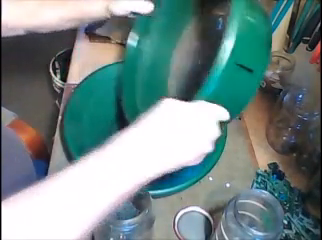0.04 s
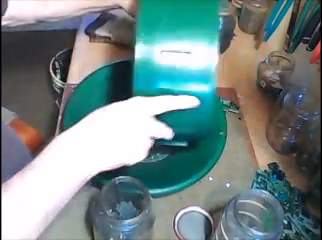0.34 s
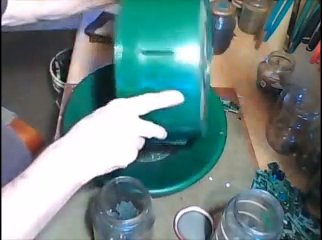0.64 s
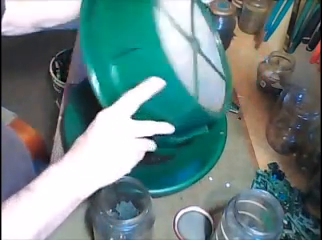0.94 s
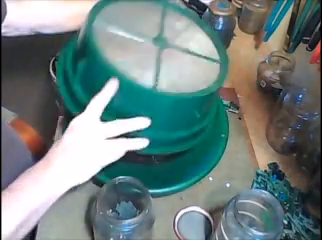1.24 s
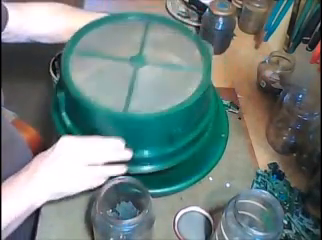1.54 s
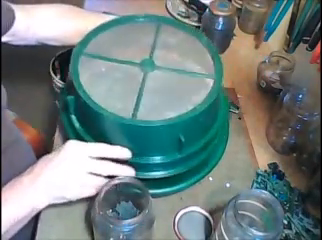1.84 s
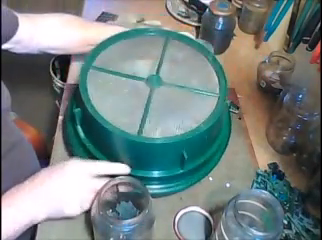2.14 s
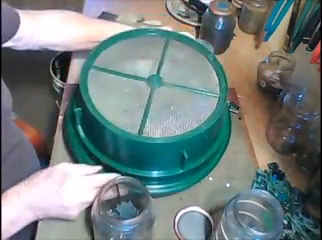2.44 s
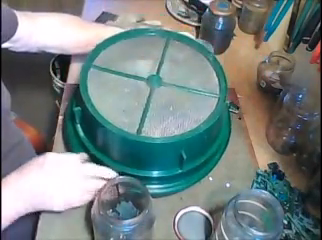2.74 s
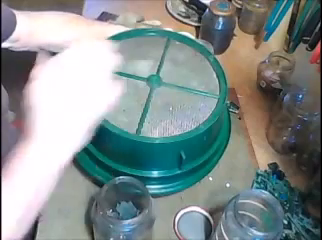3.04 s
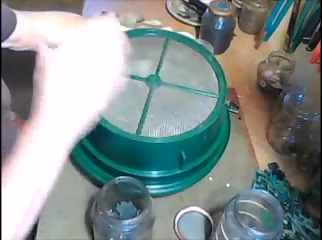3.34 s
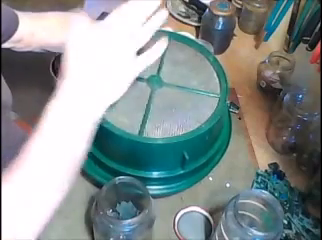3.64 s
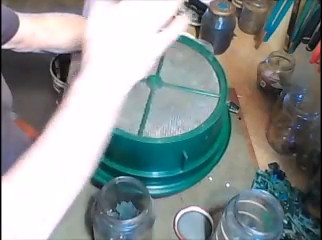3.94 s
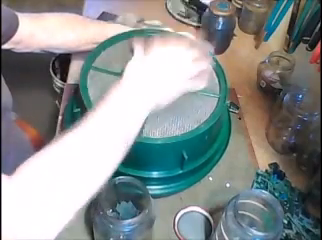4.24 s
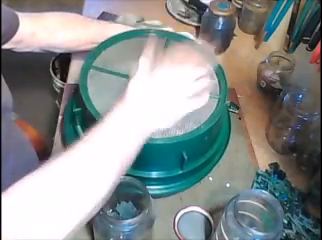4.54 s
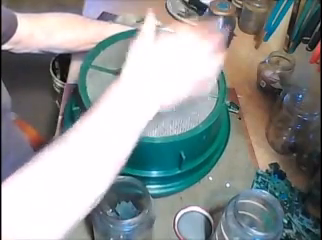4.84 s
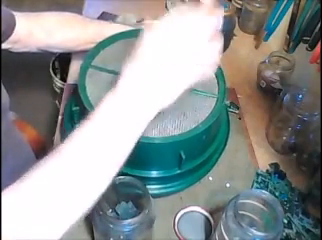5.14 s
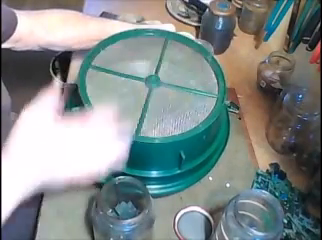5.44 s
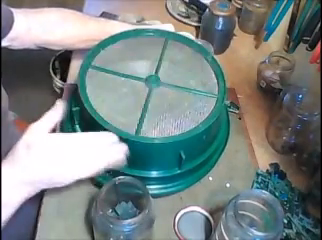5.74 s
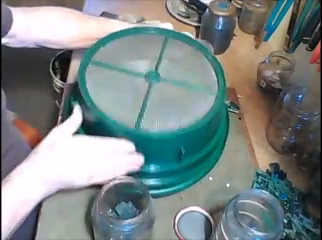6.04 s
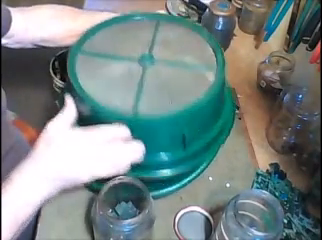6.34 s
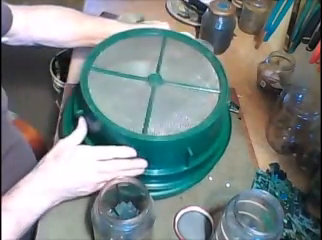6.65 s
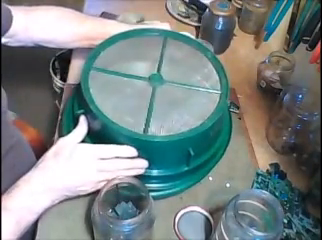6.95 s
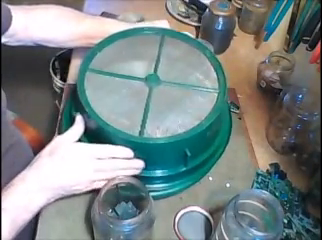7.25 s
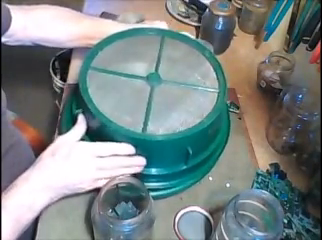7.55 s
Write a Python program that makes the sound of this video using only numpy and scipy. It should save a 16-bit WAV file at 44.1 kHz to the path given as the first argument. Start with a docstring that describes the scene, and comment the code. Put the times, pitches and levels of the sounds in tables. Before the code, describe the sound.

In a small, slightly reverberant room with a steady low hum, a plastic sieve is handled with soft bumps and ticks, then clunks onto a plastic pan. Two short rubs across the mesh lead into a run of six sharp hand slaps that shake powder loose with a faint hiss. Another loud hollow knock follows as the sieve drops again, and a lighter one ends it.

```python
"""Over room rumble and mains hum, a plastic sieve is turned over above a plastic pan on a workshop bench:
powder hisses, grit and fingers tick, and handling bumps and rubs the plastic. The sieve drops in, a hand
drags over its screen, and six slaps on the rim free the powder. It is lifted, dropped again, and settles
with a last bump. Each impact excites damped modes of sieve and pan, and a small room reverberates."""
import sys
import numpy as np
from scipy import signal
from scipy.fft import rfft, irfft, next_fast_len
from scipy.io import wavfile

SR = 44100
rng = np.random.default_rng(int(sys.argv[2]) if len(sys.argv) > 2 else 0)


def generate_wav(sig):
    """Save sig (samples, or channels by samples) to the path in sys.argv[1] as 16-bit PCM at SR."""
    pcm = np.round(np.clip(np.atleast_2d(sig).T, -1, 1) * 32767).astype(np.int16)
    wavfile.write(sys.argv[1], SR, pcm)


N = 339755
TIME = np.arange(N) / SR
# centres of the five registers of a contact force (thud, body, knock, clack, crack): f/Hz
REGISTER_HZ = [140, 350, 660, 1400, 6000]


def from_db(db):
    """Amplitude ratio of a level in decibels."""
    return 10 ** (np.asarray(db) / 20)


def rms_one(x):
    """Normalisation to unit mean power."""
    return x / np.sqrt(np.mean(x ** 2) + 1e-20)


def at_hz(table, hz, column=1):
    """Interpolation of one column on a logarithmic frequency axis."""
    table = np.array(table)
    return np.interp(np.log(hz), np.log(table[:, 0]), table[:, column])


def clicks(times, heights):
    """Impulsive excitation: one impulse per contact."""
    out = np.zeros(N)
    np.add.at(out, np.round(times * SR).astype(int), heights)
    return out


def ring(hits, hz, t60):
    """Damped harmonic oscillator: a unit impulse starts a decaying sine of amplitude 1."""
    radius, angle = from_db(-60 / (t60 * SR)), 2 * np.pi * hz / SR
    return signal.lfilter([0, np.sin(angle)], [1, -2 * radius * np.cos(angle), radius ** 2], hits + 1e-18)


def fade(hits, t60):
    """Exponential decay: each impulse dies away by 60 dB in t60 seconds."""
    return signal.lfilter([1], [1, -from_db(-60 / (t60 * SR))], hits + 1e-18)


def swell(middle, spread):
    """Gaussian envelope of a smooth stroke."""
    return np.exp(-((TIME - middle) / spread) ** 2)


def noise_bands(lowest_hz):
    """Half-octave filter bank: yields centre f/Hz, filter, and white noise of unit power in that band."""
    edges_hz = 22 * 2 ** np.arange(0, 9.6, .5)
    for low, high in zip(edges_hz, edges_hz[1:]):
        if high > lowest_hz:
            sos = signal.butter(2, [low, high], "band", fs=SR, output="sos")
            yield np.sqrt(low * high), sos, rng.choice([-1, 1], N) * np.sqrt(SR / 2 / (high - low))


def coloured_noise(spectrum):
    """Spectral shaping of white noise, scaled to unit power."""
    size = next_fast_len(N)
    hz = np.maximum(np.arange(size // 2 + 1) * SR / size, 1)
    shaped = rfft(rng.standard_normal(size)) * from_db(at_hz(spectrum, hz))
    return rms_one(irfft(shaped, size)[:N])


def contact(t, force, db, tilt=0, thud_db=0, body_db=0, knock_db=0, crack_db=0):
    """One blow as (t/s, level/dB in each register); hardness tilts its spectrum, in dB per octave."""
    octaves = np.log2(np.array(REGISTER_HZ) / REGISTER_HZ[1])
    return [t, *(np.array(force) + db + tilt * octaves + [thud_db, body_db, knock_db, 0, crack_db])]


def force_db(blows, hz):
    """Force spectrum of each blow at one frequency; a sharp clack also shakes the bench in the bass."""
    registers = np.log([45] + REGISTER_HZ)
    return np.array([np.interp(np.log(hz), registers, [clack, thud, body, knock, clack, crack])
                     for t, thud, body, knock, clack, crack in blows])


def background(rumble_db=-47):
    """Stationary noise floor: broadband room rumble and two tones of mains hum."""
    # room rumble: f/Hz, relative spectral level/dB
    rumble = [(25, -1), (60, 2), (130, -9), (190, -4.5), (280, -12.5), (390, -9.5), (600, -17),
              (1000, -20.5), (1450, -23.5), (1800, -34.5), (2300, -44), (6000, -49.5), (10000, -55.5),
              (15500, -62)]
    # mains tones: f/Hz, rms level/dB
    mains = [(59.6, -70.5), (119.6, -52.5)]
    hum = sum(np.sqrt(2) * from_db(db) * np.sin(2 * np.pi * (hz * TIME + rng.random()))
              for hz, db in mains)
    return from_db(rumble_db) * coloured_noise(rumble) + hum


def powder(grains_per_s=45, grain_db=5.0, grain_t60=0.015):
    """Shot noise: fine powder merges into a hiss, from which coarser grains stand out at random."""
    # powder sliding over screen and pan: t/s, level/dB
    slide = [(0, -71.5), (1.3, -74), (2.0, -63), (2.6, -62.5), (2.9, -77), (5.2, -60), (5.6, -80),
             (6.85, -98), (7.05, -72), (7.7, -67.5)]
    # its hiss: f/Hz, relative spectral level/dB
    spectrum = [(1000, 10.5), (2600, -5), (6800, -3.5), (9000, -15), (15000, -13)]
    grains = (rng.random(N) < grains_per_s / SR) * rng.exponential(1, N)
    texture = rms_one(1 + from_db(grain_db) * fade(grains, grain_t60))
    return from_db(np.interp(TIME, *np.transpose(slide))) * texture * coloured_noise(spectrum)


def ticks(level_db=-10.0, t60=0.044):
    """Light impacts excite mostly the upper modes; how far each reaches into the lower bands varies from tick
    to tick."""
    # grit and fingertips on the plastic: t/s, relative level/dB, extra level of the lower bands/dB
    touches = [(0.298, -46.5, -10), (0.3178, -61.5, 15.5), (.501, -50, -9), (0.7387, -57.5, -3),
               (.907, -55, -7), (1.0037, -51.5, 3), (1.1868, -52, 0), (1.271, -42, -0.5),
               (1.3676, -48.5, -8), (1.716, -47, -3), (1.8762, -45.5, 0), (2.015, -48.5, 4.5),
               (2.2015, -45, -3), (2.2625, -42.5, 3.5), (2.3149, -48, 0), (2.379, -44, 3),
               (2.461, -43.5, -1), (2.4725, -43.5, 2.5), (3.2595, -43, 3), (5.1626, -44.5, 3)]
    # spectrum of a tick: f/Hz, relative level/dB
    spectrum = [(700, 5.5), (1300, 6.5), (2200, -15), (4000, -3.5), (6500, -1.5), (9000, -10), (15000, -22)]
    times, peak_db, lower_db = np.transpose(touches + faint_ticks())
    out = np.zeros(N)
    for hz, sos, noise in noise_bands(lowest_hz=800):
        lower_share = np.interp(hz, [1500, 5000], [1, 0])
        hits = clicks(times, from_db(peak_db + lower_share * lower_db + at_hz(spectrum, hz)))
        out += signal.sosfilt(sos, noise * fade(hits, t60))
    return from_db(level_db) * out


def faint_ticks(count=7, turning_s=(.3, 1.7), db=-56.5, spread_db=2.5, lower_db=7):
    """Random impacts of loose grit as the sieve turns: further touches for ticks()."""
    moments = np.interp((np.arange(count) + rng.random(count)) / count, [0, 1], turning_s)
    return [(t, db + spread_db * rng.standard_normal(), lower_db) for t in moments]


def workshop(x, build_up_s=0.0025, diffuse_hz=1800):
    """Reverberation: reflections build up and decay; in the diffuse treble only their power counts."""
    # reverberation of the room: f/Hz, level/dB, t60/s
    room = [(58.8, -8.5, 0.15), (142, -1, 0.19), (303, -1.5, 0.46), (767, -11.5, 0.49), (1440, -4, 0.3),
            (2780, -12, 0.39), (6060, -8, 0.39), (9900, -13, 0.23), (15000, -14.5, 0.16)]
    t, response, wash = TIME[:SR], 0, 0
    for hz, sos, noise in noise_bands(lowest_hz=50):
        gain = from_db(at_hz(room, hz))
        envelope = from_db(-60 * t / at_hz(room, hz, column=2)) * (1 - np.exp(-(t / build_up_s) ** 2))
        if hz < diffuse_hz:
            tail = signal.sosfilt(sos, noise[:SR] * envelope)
            band_share = hz * (2 ** .25 - 2 ** -.25) / (SR / 2)
            response += gain * tail * np.sqrt(band_share / np.sum(tail ** 2))
        else:
            energy_decay = envelope ** 2 / np.sum(envelope ** 2)
            power = signal.fftconvolve(signal.sosfilt(sos, x) ** 2, energy_decay)[:N]
            wash += gain * signal.sosfilt(sos, noise * np.sqrt(np.abs(power)))
    return signal.fftconvolve(x, response)[:N] + wash


def bumps():
    """Soft impacts of handling put most of their force into the low registers."""
    # force of a bump: level/dB in each register
    force = [1, -9, -13, -20, -39.5]
    # handling bumps: t/s, relative level/dB, tilt/(dB per octave)
    events = [(.541, -33.5, -0.5), (.601, -40.5, -6), (0.976, -37.5, -0.5), (1.089, -42.5, 5),
              (1.153, -44, -4.5), (1.934, -28.5, 2), (3.781, -23, 3), (6.358, -26.5, 0),
              (6.791, -27.5, 2.5)]
    return [contact(t, force, db, tilt) for t, db, tilt in events]


def sieve_modes(blows, spread_db=4.5, level_db=-0.5):
    """Modal superposition: each blow lands on a new spot and so weights the modes anew."""
    # modes of sieve and pan on the bench: f/Hz, relative level/dB, t60/s
    modes = [(27.8, -14.5, 0.24), (39.8, 10.5, 0.03), (74.2, -14, 0.96), (120.7, -2.5, 0.037),
             (132.7, -4.5, 0.46), (175.3, -4, 0.032), (236.6, -8.5, 0.21), (294, -4, 0.071),
             (364.5, 2, 0.045), (405.6, -8.5, 0.23), (437, -1.5, 0.047), (467.5, -26, 0.11),
             (620, -26.5, 0.22), (600.3, 0.5, 0.039), (828.5, -4, 0.095), (815, -17.5, 0.065),
             (1046, -18.5, 0.2), (1273, -16, 0.18), (1338, 4, 0.0097), (1424, -3.5, 0.03),
             (1440, -27, 0.09), (1645, -17.5, 0.015)]
    times, out = blows[:, 0], np.zeros(N)
    spot_db = spread_db * rng.standard_normal((len(blows), len(modes)))
    for k, (hz, db, t60) in enumerate(modes):
        hits = clicks(times, from_db(force_db(blows, hz) + db + spot_db[:, k]))
        out += (-1) ** k * ring(hits, hz, t60)
    return from_db(level_db) * out


def sieve_shell(blows, snap_t60=0.009, flesh_t60=0.016, hard_db=-27):
    """Modal overlap blurs the upper modes into a clack; flesh loads them gradually, hard blows snap."""
    # crowded upper modes of the shell: f/Hz, relative level/dB, t60/s
    shell = [(600, -3, 0.044), (1063, -13.5, 0.073), (1404, 2, 0.068), (2030, -33.5, 0.032),
             (3080, -9.5, 0.048), (4770, -5.5, 0.036), (6400, -4, 0.053), (9300, -8, 0.022),
             (13400, -20.5, 0.03), (15000, -21, .03)]
    times, crack_db, out = blows[:, 0], blows[:, -1], np.zeros(N)
    hardness = np.minimum(from_db(crack_db - hard_db), 1)
    for hz, sos, noise in noise_bands(lowest_hz=600):
        heights = from_db(force_db(blows, hz) + at_hz(shell, hz))
        clack = fade(clicks(times, heights), at_hz(shell, hz, column=2))
        cushion = fade(clicks(times, heights * (1 - hardness)), flesh_t60)
        snap = fade(clicks(times, heights * hardness), snap_t60)
        out += signal.sosfilt(sos, noise * (clack - cushion + snap))
    return out


def boom(blows, level_db=-2.5):
    """Sympathetic resonance: one oscillator drives a second of equal pitch, which peaks late."""
    # hollow resonances fed through the bench: f/Hz, relative level/dB, t60/s
    resonances = [(246.7, -29.5, 0.15), (319.7, -14, 0.17), (385.5, -28, 0.29), (634, -31, 0.21)]
    times, out = blows[:, 0], np.zeros(N)
    for hz, db, t60 in resonances:
        hits = clicks(times, from_db(force_db(blows, hz) + db))
        unit_peak = 2 * np.e * np.log(1000) / (t60 * SR)
        out += unit_peak * ring(ring(hits, hz, t60), hz, t60)
    return from_db(level_db) * out


def rubs():
    """Friction sings in narrow bands: a faint groan, then a swish that falls as the slide slows."""
    # sieve being lowered: middle t/s, spread/s, f/Hz, glide/(octaves per s), half-width/Hz, level/dB
    slides = [(1.479, 0.07, 311, 0, 24, -50), (1.831, 0.096, 6850, -1.5, 580, -70)]
    out = np.zeros(N)
    for middle, spread, hz, glide, half_width_hz, db in slides:
        pitch = hz * 2 ** (glide * np.clip(TIME - middle, -.5, .5))
        tone = np.sqrt(2) * np.sin(2 * np.pi * np.cumsum(pitch) / SR)
        lowpass = signal.butter(2, half_width_hz, fs=SR, output="sos")
        roughness = rms_one(signal.sosfilt(lowpass, rng.standard_normal(N)))
        out += from_db(db) * swell(middle, spread) * roughness * tone
    return out


def drops(rock_share=.4):
    """Inelastic collision: the sieve touches with one edge, rocks down, lands flat and rebounds once."""
    # forces of the four contacts: level/dB in each register
    edge_force = [-46, -29, -38.5, -28.5, -46.5]
    rock_force = [-21, -28, -30, -28.5, -46.5]
    landing_force = [-8.5, 5, -6, -8, -21.5]
    rebound_force = [-16, -1, -1.5, -10.5, -32.5]
    # landings: t/s, relative level/dB, extra thud/dB, knock/dB, crack/dB, edge lead/s, rebound delay/s
    landings = [(2.0609, -7.5, -3, 4.5, -1, 0.013, .0116), (6.402, -9, 6.5, 13, 3.5, .0145, 0.0068),
                (7.413, -24.5, 10.5, 12.5, 4.5, .031, 0.00608)]
    out = []
    for t, db, thud_db, knock_db, crack_db, lead, rebound in landings:
        out += [contact(t - lead, edge_force, 0),
                contact(t - lead * rock_share, rock_force, 0, thud_db=thud_db),
                contact(t, landing_force, db, thud_db=thud_db, knock_db=knock_db, crack_db=crack_db),
                contact(t + rebound, rebound_force, db, thud_db=thud_db)]
    return out


def drags(count=6, jitter_s=0.00216, fade_db=-6, dulling_db_per_octave=-3.5):
    """Stick-slip motion: the hand catches at nearly even intervals, softer and duller as it goes."""
    # force of one catch: level/dB in each register
    force = [-8, 0, -4.5, -3.5, -20.5]
    # drags over the screen: start t/s, length/s, relative level/dB
    strokes = [(3.126, .102, -22), (3.364, .175, -23.5)]
    return [contact(start + length * progress + jitter_s * rng.standard_normal(), force,
                    db + fade_db * progress, dulling_db_per_octave * progress)
            for start, length, db in strokes for progress in np.linspace(0, 1, count)]


def brushes(slips_per_s=900, hiss_db=-15, rim_hz=1380, t60=0.021):
    """Friction noise: dense little slips of skin on the mesh hiss and ring the rim."""
    # hand brushing the screen: middle t/s, spread/s, level/dB
    strokes = [(3.165, 0.031, -43), (3.399, 0.039, -40.5)]
    slips = (rng.random(N) < slips_per_s / SR) * rng.standard_normal(N)
    mesh_band = signal.butter(2, [2000, 9000], "band", fs=SR, output="sos")
    hiss = signal.sosfilt(mesh_band, fade(slips, t60) * rng.standard_normal(N))
    envelope = sum(from_db(db) * swell(middle, spread) for middle, spread, db in strokes)
    return envelope * (rms_one(ring(slips, rim_hz, t60)) + from_db(hiss_db) * rms_one(hiss))


def slaps(fingers_lead_s=0.00475):
    """Impact and rebound: fingers click, the palm lands, the sieve jumps and falls back on the pan."""
    # forces of the three contacts: level/dB in each register
    fingers_force = [-24, -24, -25, -13, -26]
    palm_force = [-9, -1.5, -5, -2.5, -23]
    rebound_force = [-12, -1, -1, -5.5, -26]
    # rim slaps: t/s, relative level/dB, extra thud/dB, body/dB, knock/dB, rebound delay/s, rebound/dB
    events = [(3.8004, -11, 3.5, -1, 1.5, 0.04, -29.5), (4.1922, -13, 6.5, 6, 0.5, 0.01, -24),
              (4.502, -16, 0.5, 8.5, -3.5, 0.01045, -7), (4.738, -14.5, 8.5, -5.5, -5.5, .022, -3.5),
              (4.8133, -15, -8, 3, 2, .03, -28), (4.984, -14, 3, 0.5, -3.5, 0.077, -9.5)]
    out = []
    for t, db, thud_db, body_db, knock_db, rebound, rebound_db in events:
        out += [contact(t - fingers_lead_s, fingers_force, db),
                contact(t, palm_force, db, thud_db=thud_db, body_db=body_db, knock_db=knock_db),
                contact(t + rebound, rebound_force, db + rebound_db)]
    return out


def scene(contact_hz=2600):
    """Superposition of direct sound and room; soft contact rounds off the onset of the low modes."""
    blows = np.array(drops() + slaps() + bumps() + drags())
    soft_contact = signal.butter(2, contact_hz, fs=SR, output="sos")
    body = signal.sosfilt(soft_contact, sieve_modes(blows))
    plastic = body + sieve_shell(blows) + ticks() + brushes()
    return (plastic + boom(blows) + rubs() + workshop(plastic) + powder() + background())[None]


def record(dry):
    """Saturation in the microphone rounds the hardest peaks; a steep low-pass cuts the top."""
    ceiling, cutoff_hz = .9, 15900
    lowpass = signal.ellip(10, .1, 80, cutoff_hz, fs=SR, output="sos")
    return signal.sosfilt(lowpass, ceiling * np.tanh(dry / ceiling))


dry = scene()
out = record(dry)
generate_wav(out)
```